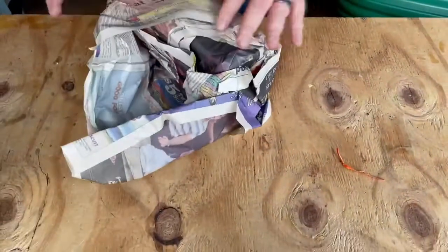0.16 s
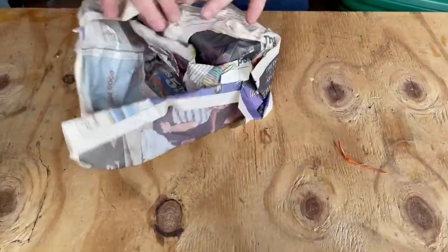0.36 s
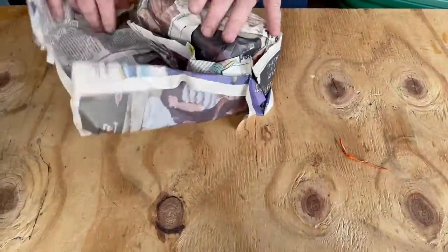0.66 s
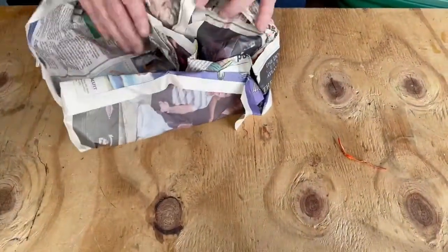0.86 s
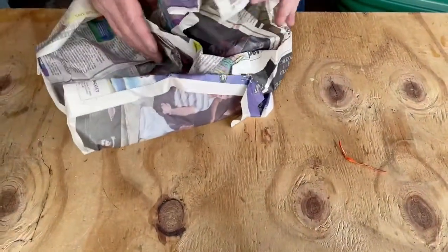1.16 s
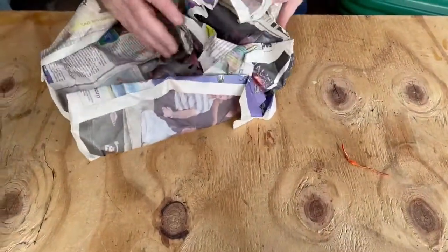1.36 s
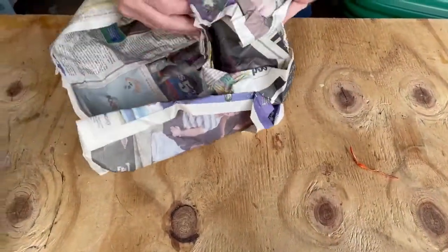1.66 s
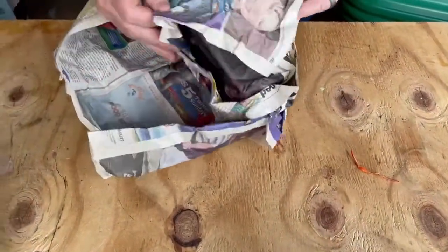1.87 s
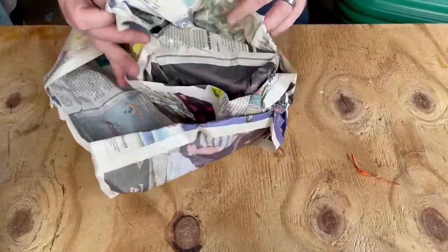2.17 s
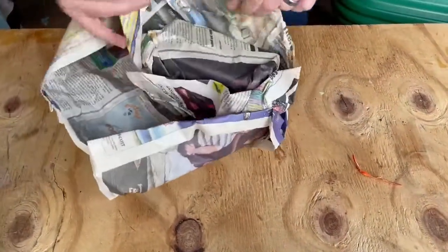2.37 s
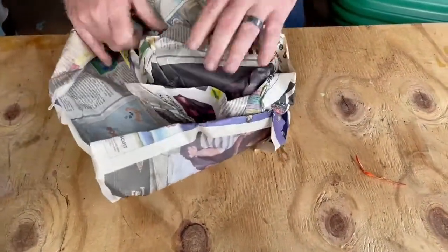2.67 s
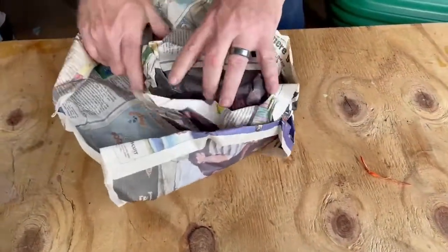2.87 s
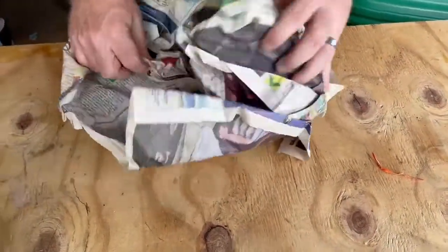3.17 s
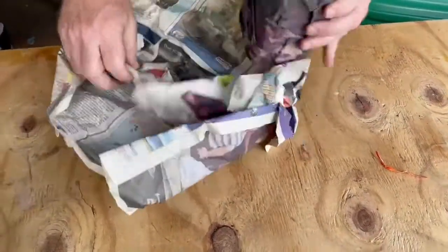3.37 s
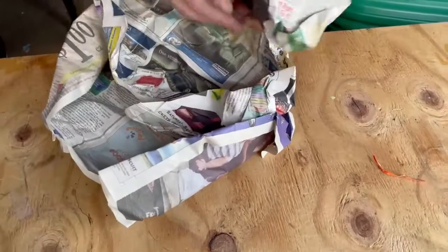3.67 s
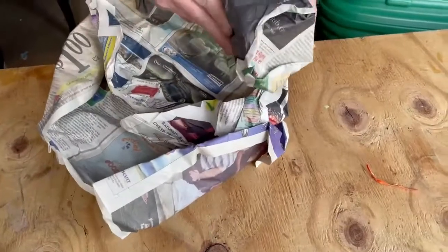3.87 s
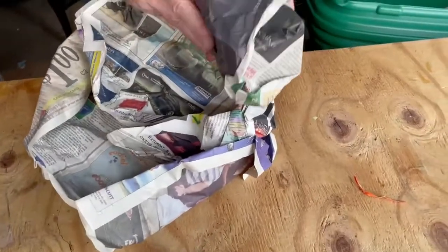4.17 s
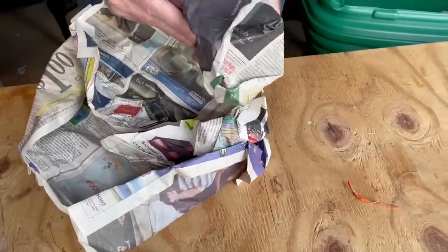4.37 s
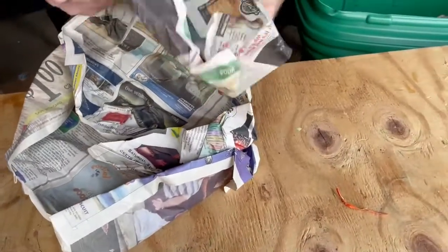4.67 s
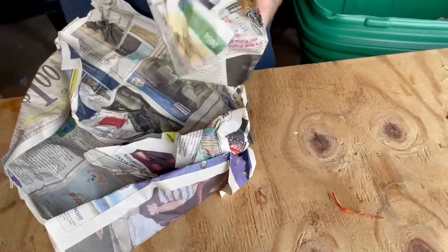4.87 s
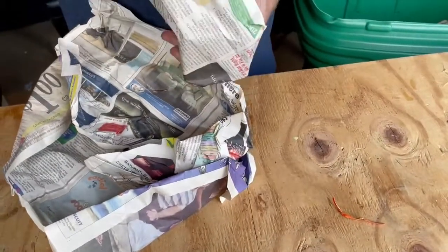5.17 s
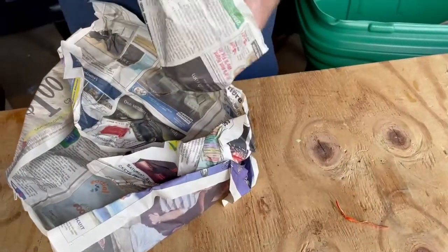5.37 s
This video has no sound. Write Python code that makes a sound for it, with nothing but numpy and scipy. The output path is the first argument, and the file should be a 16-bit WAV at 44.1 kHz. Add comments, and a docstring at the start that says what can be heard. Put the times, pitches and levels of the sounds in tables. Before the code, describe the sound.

Close to the microphone, sheets of newspaper rustle and crackle as they are grasped and pulled open. Large creases snap loudly among many tiny pops, and the bundle now and then bumps softly on the wooden table. The first part is busy, a lighter and thinner stretch follows, and fuller crumpling returns toward the end. A faint indoor hum lies underneath.

```python
"""Newspaper, crumpled and unfolded by hand on a wooden table, close under a two-port microphone.
Small creases pop by the hundred in clumps, following each grasp; a few big ones snap loudly.
Both set paper patches of every size ringing, over the hiss of sliding sheets. Big sheets add low
flaps, the bundle thumps as its weight shifts, and the table top returns a short, hollow echo.
A quiet room hums underneath."""
import sys
import numpy as np
from scipy import signal
from scipy.fft import rfft, irfft, next_fast_len
from scipy.io import wavfile
from scipy.ndimage import uniform_filter1d

SR = 44100
rng = np.random.default_rng(int(sys.argv[2]) if len(sys.argv) > 2 else 0)


def to_wav(sig):
    """Store sig (one row per channel, or 1-D mono) as 16-bit WAV at the path in sys.argv[1].

    Samples outside -1..1 are clipped; the rate is SR.
    """
    pcm = np.clip(np.atleast_2d(sig), -1, 1) * 32767
    pcm = np.round(pcm).astype(np.int16)
    wavfile.write(sys.argv[1], SR, pcm.T)  # frames by channels


N = 244041
FOLD_SAMPLES = 1500  # a fold keeps its resonances for about 35 ms


def gain_of(db):
    """dB to amplitude; gain_of(2 * db) is power."""
    return 10 ** (np.asarray(db) / 20)


def unit_rms(x):
    """Scales to rms 1."""
    return x / np.sqrt(np.mean(x ** 2) + 1e-20)


def columns_at(points, hz):
    """Columns of a table at the given frequencies."""
    f, *columns = np.transpose(points)
    return [np.interp(np.log(hz + 1), np.log(f + 1), c) for c in columns]


def decay(kicks, t60):
    """Power that jumps at each kick and dies away; the total energy is kept."""
    r = np.exp(-2 * np.log(1000) / (t60 * SR))
    return signal.lfilter([1 - r], [1, -r], kicks)


def patch_level(hz, thump_db, flap_db, effort_db, crisp_db):
    """Level of a patch in dB: thump rules the bass, then flap, effort and, at the top, crispness."""
    anchors = np.log([90, 500, 1600, 5500, 12000])  # Hz
    weights = [np.interp(np.log(hz), anchors, row) for row in np.eye(len(anchors))]
    return sum(w * db for w, db in zip(weights, (thump_db, flap_db, effort_db, effort_db, crisp_db)))


def gestures(t, start, length, db, rise, sag, fall, rest_db):
    """Level in dB of gestures that swell up to their start, sag, then fade; slopes in dB/s."""
    since = t[:, None] - start
    shape = rise * np.minimum(since, 0) - sag * np.clip(since, 0, length)
    shape -= fall * np.maximum(since - length, 0)
    return 10 * np.log10(gain_of(2 * (db + shape)).sum(1) + gain_of(2 * rest_db))


# Grasps of the hands, close under the microphone: t/s, length/s, effort/dB, flap/dB re effort
GRASPS = [(0.0, 0.094, -46, 1), (0.206, 0.049, -34.5, -10), (0.345, 0.071, -35.5, -5),
          (0.578, 0.063, -36.5, -2.5), (0.619, 0.036, -34.5, 2), (0.768, 0.06, -34, -4.5),
          (0.885, 0.24, -36, -1.5), (1.16, 0.17, -41, -5), (1.373, 0.28, -36.5, -4.5),
          (1.71, 0.046, -39.5, -6), (1.8, 0.072, -30.5, -2.5), (1.95, 0.2, -32.5, -5),
          (2.195, 0.091, -34.5, -2), (2.324, 0.23, -35, -5.5), (2.558, 0.11, -46, -6),
          (2.726, 0.092, -45, -16), (2.793, 0.033, -39, -2.5), (2.89, 0.05, -35.5, -3),
          (2.992, 0.38, -36, -5.5), (3.376, 0.072, -44.5, -4), (3.567, 0.024, -38, -12),
          (3.683, 0.16, -40.5, -34), (3.913, 0.24, -42, -13.5), (4.135, 0.032, -33.5, -14.5),
          (4.243, 0.098, -36.5, -11), (4.377, 0.1, -34, -5), (4.527, 0.031, -40, 3),
          (4.565, 0.089, -35.5, 2), (4.769, 0.093, -40.5, -2), (4.883, 0.096, -38, -9.5),
          (5.061, 0.028, -35, -3.5), (5.29, 0.077, -32.5, -3.5), (5.528, 0.04, -37.5, -9)]


def hands(t):
    """Flap, effort and crispness in dB: each grasp works the paper, which settles in between."""
    start, length, db, flap_db = np.transpose(GRASPS)
    slopes = dict(rise=411, sag=3, fall=213)
    effort = gestures(t, start, length, db, **slopes, rest_db=-56)
    flap = gestures(t, start, length, db + flap_db, **slopes, rest_db=-64.5)
    crispness = effort - 11.5
    return flap, effort, crispness


def pops(per_s=480, spread_db=3.2, clump_db=-0.3, steadiness=0.45):
    """Energy of small creases giving way at random: clumped, a few large, partly evened out."""
    clumps = unit_rms(uniform_filter1d(uniform_filter1d(rng.standard_normal(N), 500), 500))
    size_db = spread_db * np.minimum(rng.exponential(1, N), 4) + clump_db * clumps
    energy = gain_of(2 * size_db) * (rng.random(N) < per_s / SR)
    local_mean = uniform_filter1d(uniform_filter1d(energy, 2500), 2500) + 1e-9
    energy = energy / local_mean ** steadiness
    return energy / energy.mean()


def rustle(pop_energy, t, level_db, pop_spread_db=3.0, fold_spread_db=5.0, slide_db=-12):
    """Energy reaching one patch: pops, varied singly and fold by fold, and the hiss of sheets sliding."""
    at, kicks = np.flatnonzero(pop_energy), np.zeros(N)
    folds = np.clip(rng.standard_normal(N // FOLD_SAMPLES + 2), -2, 1.2)
    fold_db = fold_spread_db * np.interp(at / FOLD_SAMPLES, np.arange(len(folds)), folds)
    pop_db = pop_spread_db * np.clip(rng.standard_normal(len(at)), -2, 2)
    kicks[at] = pop_energy[at] * gain_of(2 * (pop_db + fold_db))
    power = gain_of(2 * np.interp(np.arange(N) / SR, t, level_db))
    return kicks / kicks.mean() * power, gain_of(2 * slide_db) * power


# Room tone, all around the table: f/Hz, relative spectral level/dB
ROOM_TONE = [(18, -36), (30, 9), (80, -35), (420, -20), (2140, -21), (7000, -7), (9100, -10), (15400, -120)]


def room(level_db=-60, swell_db=0.58):
    """Steady low hum and faint air, swelling slightly."""
    colour_db, = columns_at(ROOM_TONE, np.fft.rfftfreq(N, 1 / SR))
    hum = unit_rms(irfft(rfft(rng.standard_normal((2, N))) * gain_of(colour_db), N))
    swell = unit_rms(uniform_filter1d(rng.standard_normal(N), 6000))
    return hum * gain_of(level_db + swell_db * swell)


# Loud creases, close up: t/s, level/dB, flap/dB re level, buckling patch f/Hz, crispness/dB re level
LOUD_CREASES = [(0.216, -33, 2.5, 4060, -15), (0.3763, -31, -26, 2620, -14), (0.4005, -33, -13, 6590.0, 6),
                (0.4071, -34, -7, 6200, 3), (0.531, -41, -1, 3200, 6), (0.5705, -30, -24, 3790.0, -20),
                (0.593, -29, -9, 4450, -5), (0.646, -33.5, 4, 3660, -13), (0.6585, -27, -23, 4160, -9),
                (0.8292, -36, 2, 4390.0, -4), (0.863, -24.5, -0.5, 4000, -9),
                (0.868, -23.5, -4, 6800, -4.5), (0.9141, -26.5, -26, 4500, -16),
                (1.0193, -30, 0, 1350, -15.0), (1.0377, -28.5, -10, 6120.0, -23),
                (1.1035, -43, 1, 3000, -13), (1.1097, -32.5, 4.5, 2020, -28), (1.262, -33, -28, 4120, -37),
                (1.3569, -36, 9.5, 2650, -28), (1.3776, -33, -14, 2900, -7), (1.4005, -31.5, -5, 1730, -23),
                (1.4212, -31.5, 5.5, 1220, -35), (1.49, -33, -20, 7700, 4), (1.508, -30.5, -1, 4000, -8),
                (1.518, -27, -9, 1830, -9), (1.54, -32, -12, 4000, -16), (1.5461, -31, -18, 2500, -2),
                (1.622, -29.5, 2, 2260, -31), (1.6862, -31.5, 0.5, 2500, -36),
                (1.7227, -35, 2, 2760.0, -37), (1.7512, -33.5, -19, 2620, -30), (1.762, -31, -9, 2590, -34),
                (1.7879, -33.5, 9.5, 1590.0, -27), (1.811, -28.5, 7.5, 1980, -28),
                (1.8212, -21, -1, 2220, -11), (1.8418, -25, 2, 2330, -29), (1.898, -30, -10, 2180, -30),
                (1.9866, -30, 3, 2710.0, -19), (2.009, -31, -1, 3020, -34.5), (2.049, -27.5, 1, 3130, -9),
                (2.073, -29.5, 8, 3340, -6), (2.0808, -29, 8.5, 1560, -13.0), (2.103, -31.5, -5, 5600, -15),
                (2.1187, -42, 1, 3750.0, -12.0), (2.13, -40.5, 13, 1500, -18),
                (2.1781, -28.5, 5.5, 1180, -16.0), (2.19, -30, 7.5, 2360, -19.0),
                (2.219, -31, -12, 6890.0, -7), (2.24, -32.5, 5, 2150.0, -7), (2.3905, -34, 5, 2150.0, -23),
                (2.404, -34, -8, 5040.0, -8), (2.4536, -27.5, -9, 6000, -10.0),
                (2.4832, -33.5, 4, 1550.0, -3), (2.631, -39.5, -6, 1980, -20),
                (2.8242, -33, -15, 4060, -17), (2.8495, -33, 2, 1210.0, -39), (2.8985, -32, 4, 1120, -3),
                (2.9215, -35.5, 5, 2070.0, -4), (3.1222, -31.5, 5, 2000, -8), (3.16, -31.5, 1, 5640, -5),
                (3.1655, -38, -17, 10700, 6.5), (3.2095, -29, -25, 2880, -20),
                (3.3517, -33.5, -24, 2110.0, -2), (3.3568, -27.5, -3.5, 2950, -11),
                (3.5142, -36.5, -24.0, 2440, -10), (3.5307, -29, -16, 4550, -11),
                (3.6485, -29.5, -50, 3800, -20), (3.742, -36.5, -2.5, 3620.0, -16),
                (3.7593, -45, -21, 5770.0, -11), (3.8256, -41, -8, 6120.0, -8),
                (3.8593, -40.5, -19, 5800, -20), (3.9684, -38.5, -2.5, 3450, -31),
                (4.0108, -41, -26, 7360, 1), (4.1435, -41, -4, 1950, 7), (4.195, -31.5, -7, 1590.0, -33),
                (4.231, -37, -17, 4170, -15), (4.2707, -32, -31.0, 4950.0, -17),
                (4.291, -27.5, -4, 1430, -9), (4.3276, -30.5, -2, 4600, -2), (4.3343, -37, -27, 4350.0, -6),
                (4.408, -26.5, -4, 2700, -31), (4.5318, -35.5, -8, 1550.0, -3),
                (4.5518, -40, 11, 6800.0, -13), (4.5755, -31.5, 8, 2240.0, -7),
                (4.6097, -34, 11.5, 2380, -20), (4.62, -32, 12, 1440, -16), (4.6712, -32, -5, 7200, 0),
                (4.692, -25, -15, 3340, -7), (4.7004, -27, -7, 1590, -25), (4.8053, -30.5, 0, 2340, -4),
                (4.8495, -31.5, -3, 4400, -13), (4.8704, -36, -16, 3420, -5),
                (4.937, -33.5, -21, 5170.0, -8), (5.0585, -32.5, 6, 1930, -24), (5.0903, -30, -2, 3680, 2),
                (5.1099, -26, -4.5, 2270, -4), (5.1553, -30.5, 1.5, 1860, -39),
                (5.2143, -46, 13, 1490, -22), (5.2655, -35, -2, 2480, -23), (5.2808, -33, -24, 1590.0, -34),
                (5.299, -26.5, -34, 2880, -24), (5.384, -26, -30, 3200, -12.0),
                (5.407, -29, -17, 3830.0, -16), (5.4234, -31, -4.5, 2000, -21),
                (5.4767, -35.5, -28, 2250, -46)]


def snaps(scatter_db, steps, hz, t60, pitch_db=9.5, pitch_oct=0.23, thump_db=-12, buckle_s=0.018):
    """Energy reaching one patch as loud creases buckle in steps, most at each one's own pitch."""
    start, db, flap, pitch_hz, crisp = np.transpose(LOUD_CREASES)
    db = db + scatter_db + patch_level(hz, flap + thump_db, flap, 0, crisp)
    db += pitch_db * np.exp(-(np.log2(hz / pitch_hz) / pitch_oct) ** 2)
    # later steps are weaker, less so where a big sheet flaps along
    step_db = db[:, None] + np.minimum(-9 + .4 * flap, -6)[:, None] * (steps > 0)
    late_s = 1.5 / max(hz, 1200) * rng.random(steps.shape)  # a patch joins up to 1.5 cycles late
    early_s = .7 / hz  # big patches are struck a little early, so that every size peaks together
    step_s = start[:, None] + buckle_s * steps + late_s - early_s
    energy = gain_of(2 * step_db) * t60 * SR / (2 * np.log(1000))
    kicks = np.zeros(N)
    np.add.at(kicks, np.round(step_s * SR).astype(int), energy)
    return kicks


# The bundle on the wooden table, under the microphone: t/s, level/dB
WEIGHT_SHIFTS = [(.65, -35), (2.085, -31), (2.23, -33.5), (2.49, -37.5), (5.12, -37), (5.32, -44)]


def thumps(t):
    """Bass level in dB: it swells briefly as the bundle's weight shifts on the table."""
    start, db = np.transpose(WEIGHT_SHIFTS)
    return gestures(t, start, 0, db, rise=375, sag=0, fall=169, rest_db=-51.5)


def patch_ring(power, cracks, hz, q=2.13):
    """One patch resonates, driven by sudden cracks and by two unrelated rows of shaped noise."""
    b, a = signal.iirpeak(hz, q, fs=SR)
    drive = rng.standard_normal((2, N)) * np.sqrt(power)
    drive += cracks * [[1], [rng.choice([-1, 1])]]
    ring = signal.lfilter(np.convolve(b, b), np.convolve(a, a), drive)  # the resonance applied twice
    return ring * np.sqrt(SR * q / hz / 2.965)  # evens out the bandwidth


# Patches of newsprint ringing, heard close: f/Hz, level/dB, base t60/s
PATCH_RINGS = [(49.7, -9, 0.035), (85.5, -4.5, 0.0082), (185, -6.5, 0.019), (503, -3, 0.039),
               (1330, -9.5, 0.081), (2040, -5, 0.062), (3880, -6, 0.06), (5470, -7, 0.062),
               (9330, 2, 0.065), (15800, -2.5, 0.0068)]


def paper(pop_tail_db=-7, snap_tail_db=-11, tail_s=0.32):
    """Every patch size rings under pops and snaps: part crack, part short rattle, then a soft tail."""
    patch_hz = np.geomspace(50, 16000, 21)
    pop_energy = pops()
    scatter_db = 0.5 * rng.standard_normal((len(LOUD_CREASES), len(patch_hz))).T
    steps = rng.random((len(LOUD_CREASES), 4)) * [0, 1, 1, 1]  # one at once, three later
    t = np.arange(0, N + 256, 256) / SR
    handling_db = thumps(t), *hands(t)
    out = np.zeros((2, N))
    for k, (hz, db, t60) in enumerate(zip(patch_hz, *columns_at(PATCH_RINGS, patch_hz))):
        popping, sliding = rustle(pop_energy, t, patch_level(hz, *handling_db))
        snapping = snaps(scatter_db[k], steps, hz, t60)
        # share of the energy that cracks: greatest in small patches
        pop_share, snap_share = np.array([.33, .4]) * (hz / 4000) ** .3
        # neighbouring patches swing in opposite ways, so that a crack stays broad
        cracks = (-1) ** k * np.sqrt(pop_share * popping + snap_share * snapping)
        rattle = decay((1 - pop_share) * popping, .55 * t60)
        rattle += decay((1 - snap_share) * snapping, .24 * t60)
        # the layers of paper and the table carry the tail
        tail = decay(gain_of(2 * pop_tail_db) * popping + gain_of(2 * snap_tail_db) * snapping, tail_s)
        out += gain_of(db) * patch_ring(rattle + tail + sliding, cracks, hz)
    return out


def table_echo(x, delay_range_s=(.0006, .003), echo_db=-12):
    """Adds the table top's echo; its delay changes fold by fold, giving each its own hollow colour."""
    delay_s = np.repeat(rng.uniform(*delay_range_s, N // FOLD_SAMPLES + 1), FOLD_SAMPLES)[:N]
    echo = x[:, np.maximum(np.arange(N) - (delay_s * SR).astype(int), 0)]
    return (x + gain_of(echo_db) * echo) / np.sqrt(1 + gain_of(2 * echo_db))


def scene():
    """Paper, table and room. Rows: what both ports share, and what only the right port picks up."""
    return table_echo(paper()) + room()


# Two-port microphone, just above the paper: f/Hz, colour/dB, left minus right/dB, likeness/0-1
MIC_PORTS = [(25, -8, -1, .97), (50, .1, -1, .97), (600, .1, -1.5, .96), (1700, .1, -3, .86),
             (3300, .1, 2.5, .6), (5500, .1, 2, .66), (7200, .1, .9, .85), (7800, 0, 0, .995),
             (8700, 0, 0, .995), (9700, 0, 0, .85), (10800, -1, 0, .995), (12400, -3, 0, .995),
             (13300, -2, 0, .7), (14000, 0, 0, .995), (15700, 4, 0, .995), (15900, -18, 0, .99)]
# Phase between its ports: f/Hz, lead of the left port/rad
LEFT_LEAD = [(0, 0), (1720, 0.3), (2580, 1.2), (3620, 0.5), (5080, 0.6), (6200, -0.5), (6800, -1.0),
             (7670, -2.9), (8870, -3.3), (10500, -6.0), (12700, -6.6), (13000, -6.9), (13300, -8.2),
             (13900, -9.3), (16200, -9.5)]


def record(dry, band_limit_hz=16600):
    """Two ports close together: alike, but out of step in parts of the treble; then the band limit."""
    size = next_fast_len(N + 4096)
    hz = np.fft.rfftfreq(size, 1 / SR)
    colour_db, balance_db, likeness = columns_at(MIC_PORTS, hz)
    lead_rad, = columns_at(LEFT_LEAD, hz)
    shared, right_only = rfft(dry, size)
    right = (likeness * shared + np.sqrt(1 - likeness ** 2) * right_only) * np.exp(-1j * lead_rad)
    spectra = np.array([shared * gain_of(balance_db / 2), right * gain_of(-balance_db / 2)])
    pair = irfft(spectra * gain_of(colour_db), size)[:, :N]
    lowpass = signal.firwin(511, band_limit_hz, window=("kaiser", 9), fs=SR)
    return signal.oaconvolve(pair, lowpass[None], "same")


dry = scene()
out = record(dry)
to_wav(out)
```